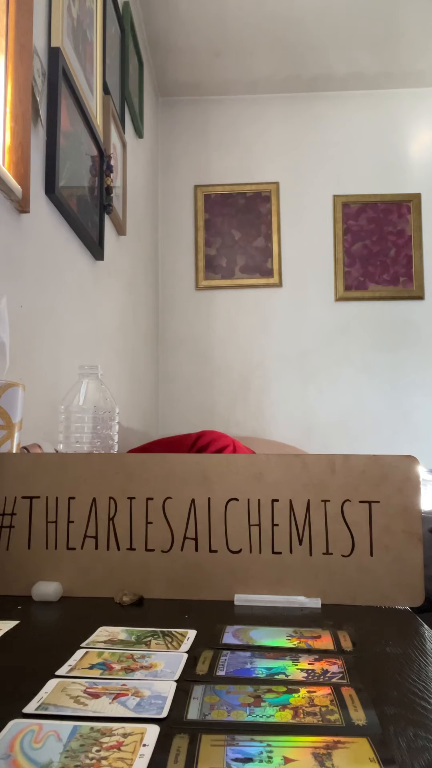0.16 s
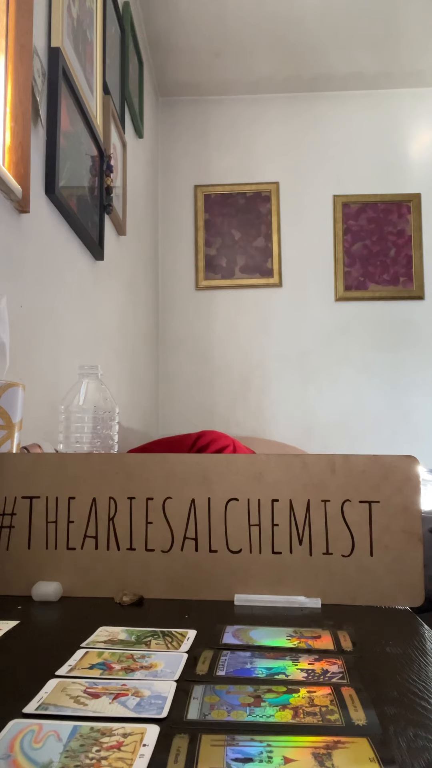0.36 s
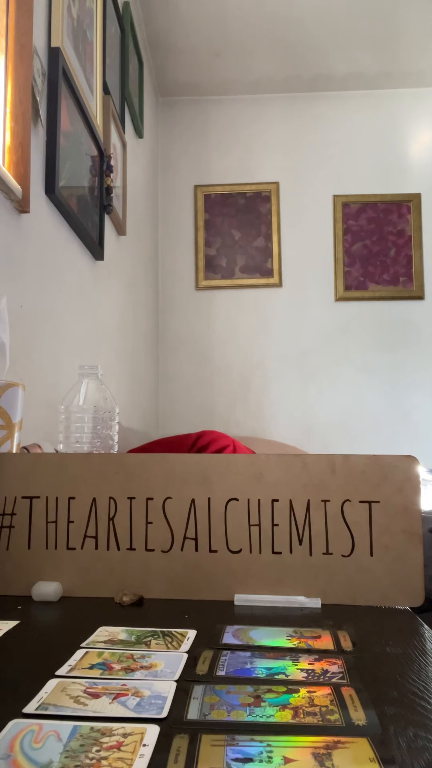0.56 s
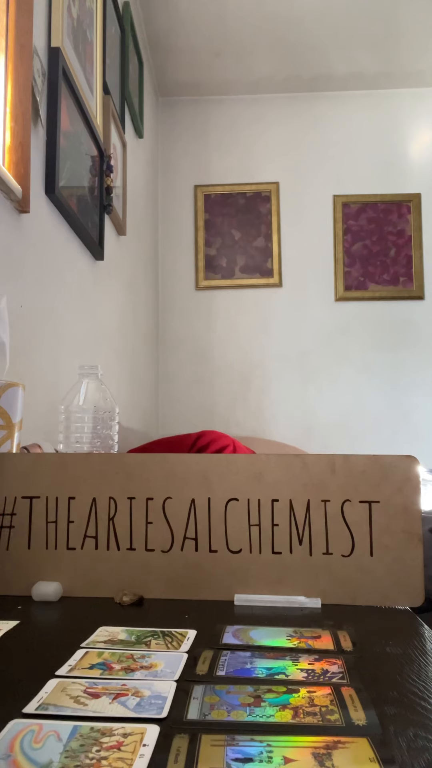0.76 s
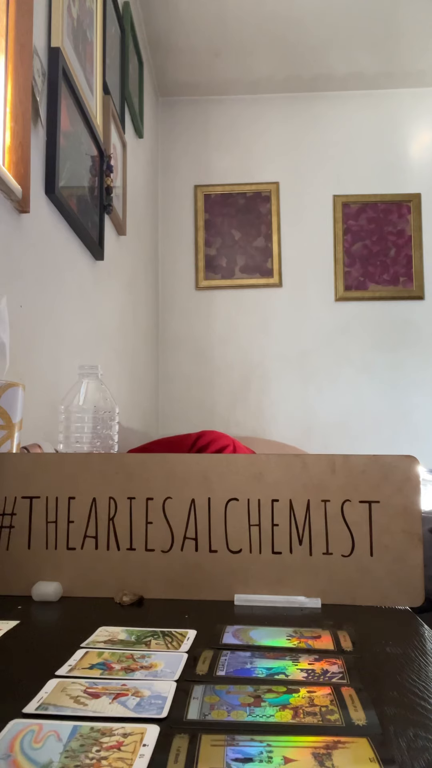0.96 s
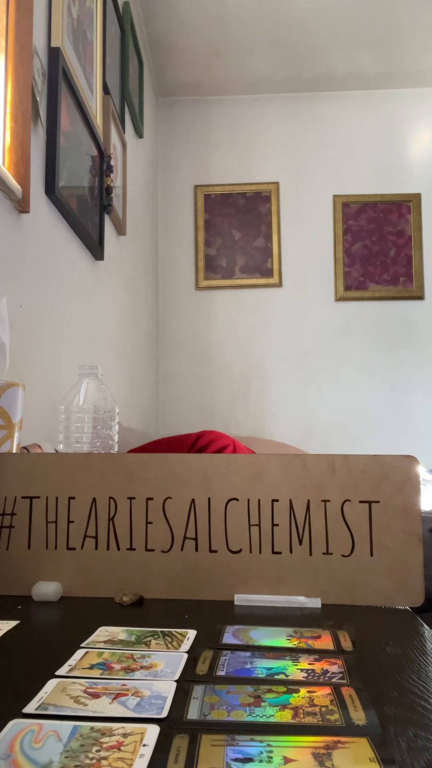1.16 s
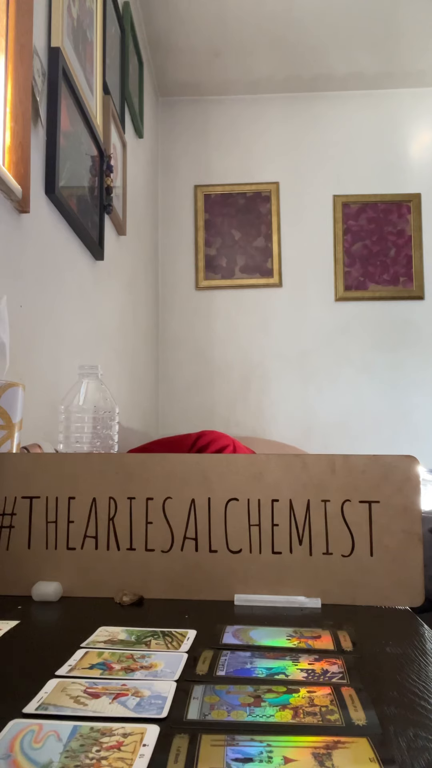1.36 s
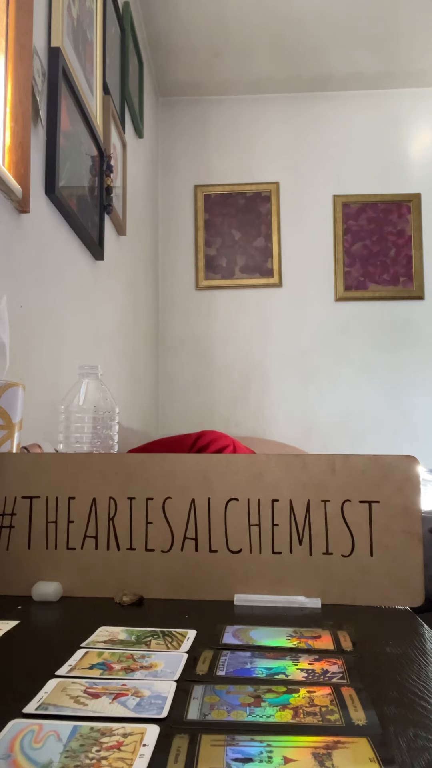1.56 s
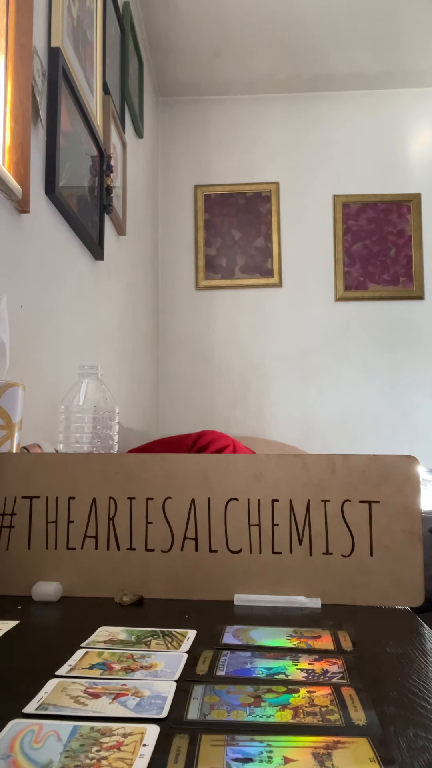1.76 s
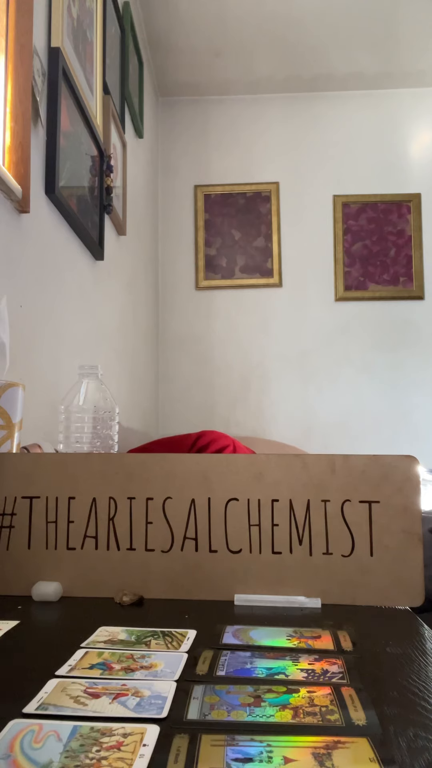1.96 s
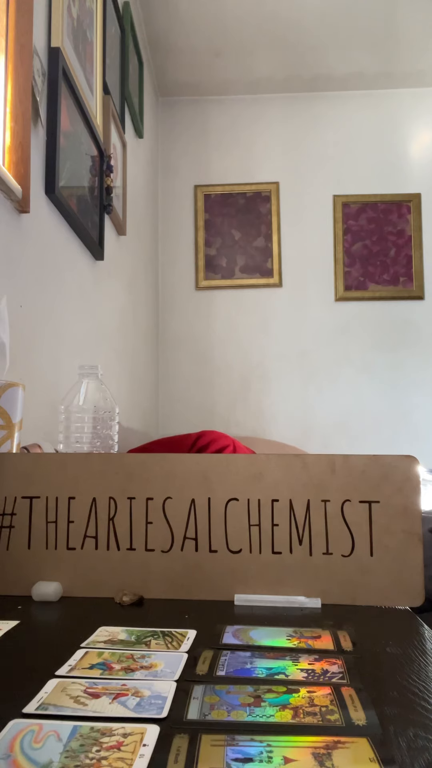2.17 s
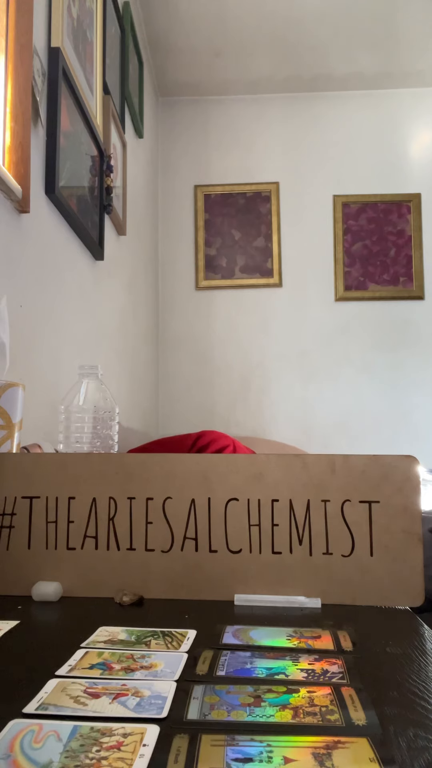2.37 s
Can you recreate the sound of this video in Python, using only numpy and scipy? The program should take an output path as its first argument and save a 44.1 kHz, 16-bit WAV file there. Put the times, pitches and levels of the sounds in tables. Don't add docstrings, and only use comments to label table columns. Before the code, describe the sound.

A deck of stiff cards is shuffled overhand close to a stereo microphone in a small quiet room. After a near-silent start, packets snap sharply from 0.15 to 0.7 seconds, some with a hollow tock, over soft table bumps and rustling. A denser burst closes around 1.05. Faint squaring taps follow, with a clearer double click near 1.76, then light sliding fades by 2.4.

```python
import sys
import numpy as np
from scipy import signal
from scipy.fft import rfft, irfft
from scipy.io import wavfile

SR = 44100
rng = np.random.default_rng(int(sys.argv[2]) if len(sys.argv) > 2 else 0)


def volts_from_decibels(level):
    exponent = np.asarray(level, float) / 20
    return 10 ** exponent


def persist_wave(psi):
    counts = np.round(np.clip(psi, -1, 1) * 32767).astype(np.int16)
    wavfile.write(sys.argv[1], SR, np.atleast_2d(counts).T)


N = 105840


def rms_one(x):
    return x / np.sqrt(np.mean(x ** 2) + 1e-20)


def peak_one(x):
    return x / (np.abs(x).max() + 1e-20)


def at_hz(points, hz):
    points = np.array(points)
    return np.interp(np.log(hz + 1), np.log(points[:, 0]), points[:, 1])


def colour(x, points):
    size = x.shape[-1]
    hz = np.arange(size // 2 + 1) * SR / size
    below = np.minimum(hz / points[0][0], 1) ** 3
    return irfft(rfft(x) * volts_from_decibels(at_hz(points, hz)) * below, size)


def band(x, order, low_hz, high_hz):
    return signal.sosfilt(signal.butter(order, [low_hz, high_hz], "band", fs=SR, output="sos"), x)


def ring(x, hz, t60):
    r, w = volts_from_decibels(-60 / (t60 * SR)), 2 * np.pi * hz / SR
    return signal.lfilter([0, np.sin(w)], [1, -2 * r * np.cos(w), r * r], x + 1e-18)


def drift(rate_hz):
    r = np.exp(-2 * np.pi * rate_hz / SR)
    noise = rng.standard_normal(N + 9000)
    return rms_one(signal.lfilter([1], [1, -2 * r, r * r], noise)[9000:])


def grains(chance, rate, spread_db):
    size = volts_from_decibels(-spread_db * np.log(chance[1] + 0.001))
    return (chance[0] < rate / SR) * size * np.sign(chance[2] - .5)


# freq_hz, share
OWN_SHARE = [(300, 0.42), (1000, 0.51), (3000, 0.88), (5500, 0.83), (6800, 0.58), (11000, 0.067),
             (14000, 0.022)]
# freq_hz, left_lead_rad
PORT_PHASE = [(60, 0), (1000, -.6), (2300, .7), (3500, -2.6), (5000, -3.8), (6600, -6.6), (9500, -7.6),
              (14000, -9.42)]


def ports(shared, own):
    hz = np.arange(len(shared) // 2 + 1) * SR / len(shared)
    share = np.clip(at_hz(OWN_SHARE, hz), 0, 1) * hz ** 2 / (hz ** 2 + 400 ** 2)
    lead = np.exp(1j * at_hz(PORT_PHASE, hz) * np.array([[1], [0]]))
    return irfft(rfft(shared) * np.sqrt(1 - share) * lead + np.sqrt(share) * rfft(own), len(shared))


def patchy(x):
    octave = np.log2(np.arange(N // 2 + 1) * SR / N + 1)
    spectrum = rfft(x)
    out = 0
    for k in range(5, 16):
        part = irfft(spectrum * np.clip(1 - np.abs(octave - k), 0, 1), N)
        out = out + part * volts_from_decibels(3 * drift(5.85))
    return out


# start_s, level_db, palm_contact_db, edge_hiss_db
SLIDE = [(0, -75.5, 16.5, -5), (.05, -89.5, 15.5, 7), (.125, -92, 9, -3), (.15, -37, 9, -11),
         (.29, -66.5, 17.5, 15), (.37, -55.5, 0, -2), (.45, -44, -3, -9), (.58, -54.5, 14, 5.5),
         (.8, -48, 6.5, -25), (.95, -47.5, 13, 2), (1.08, -54, 12.5, -16), (1.24, -62.5, 2, 8.5),
         (1.42, -58, -1.5, -1.5), (1.55, -45, -16, -3), (1.85, -44, 9.5, 0.5), (2.0, -57, 6, 5.5),
         (2.05, -66.5, 6.5, -2), (2.28, -60, -12.5, 3), (2.4, -57, -8.5, 2.5)]
# freq_hz, density_db
RUSTLE = [(150, -0.5), (800, 9), (1200, 1.5), (2600, 3), (4500, -1), (6000, -9), (11000, -10), (16000, -14)]
# freq_hz, level_db, t60_s
STACK = [(1570, 7, 0.02), (1732, 4.5, 0.015), (2200, -6.5, 0.087), (2500, -2, 0.035), (2902, 7.5, 0.013),
         (3820, -5.5, 0.0076), (4430, -6.5, 0.011), (4930, -40, 0.0069)]


def sliding():
    s, db, palm_db, edge_db = np.transpose(SLIDE)
    t = np.arange(N) / SR
    rub = grains(rng.random((3, 3, N)), rate=12000, spread_db=2.0)
    ringing = 0
    for k, (hz, mode_db, t60) in enumerate(STACK):
        ringing = ringing + volts_from_decibels(mode_db) * ring(rub, hz, t60 / 2) * (-1) ** k
    hiss = rms_one(rms_one(colour(rub, RUSTLE)) + volts_from_decibels(-9.5) * rms_one(ringing))
    palm_hz, edge_hz = 900, 5800
    dull = signal.filtfilt(*signal.butter(1, palm_hz * 1.36, fs=SR), hiss)
    edge = signal.lfilter(*signal.butter(2, edge_hz, "high", fs=SR), hiss)
    hiss = hiss + (volts_from_decibels(np.interp(t, s, edge_db)) - 1) * edge
    hiss = hiss + (volts_from_decibels(np.interp(t, s, palm_db)) - 1) * dull
    flicker_db = 2.2 * drift(33.4)
    hiss = patchy(hiss) * volts_from_decibels(np.interp(t, s, db) + flicker_db)
    heard = ports(hiss[0], hiss[1:])
    opposed = np.arange(N // 2 + 1) * SR / N > 11400
    return heard - irfft(rfft(heard.mean(0)) * opposed, N)


# peak_s, peak_db, pitch_hz
THUMPS = [(0.044, -48, 88.8), (0.16, -43, 68.5), (0.264, -27, 81), (0.41, -34.5, 91), (0.602, -31, 85.3),
          (0.738, -28, 62.7), (0.886, -36.5, 70), (1.048, -27.5, 64.7), (1.191, -41.5, 78.4),
          (1.26, -47, 78.6), (1.314, -41.5, 67.5), (1.7, -50.5, 68), (1.772, -32, 119), (1.951, -57.5, 82)]


def table():
    t, bumps = np.arange(N) / SR, 0
    for s, db, hz in THUMPS:
        push = np.exp(-((t - s) / 0.0042) ** 2)
        bumps = bumps + volts_from_decibels(db) * peak_one(ring(push, hz, t60=0.12))
    noise = rng.standard_normal((2, N))
    rumble = rms_one(band(noise[0], 2, 50, 130))
    hush = rms_one(band(noise[1], 1, 150, 900))
    s, slide_db, palm_db, _ = np.transpose(SLIDE)
    hands_db = np.interp(t, s, slide_db + 2 * palm_db)
    rumble_db = -61 + 0.45 * (hands_db + 55.0)
    return bumps + volts_from_decibels(rumble_db) * rumble + volts_from_decibels(-95.5) * hush


# start_s, peak_db, body_db (re peak), snap_db (re peak), ring_hz
DROPS = [(0.14, -26, 7, -7, 3300), (0.1545, -14, -8, -18, 2860), (0.16, -9.5, -5, 1, 2360),
         (0.176, -21.5, -12, -23, 4110), (0.2055, -8, -40, -16, 2170), (0.253, -8, -4.5, -3.5, 2720),
         (0.264, -17, -40.5, -10, 2300), (0.338, -32, 1, -14, 2840), (0.381, -28.5, 12, -16, 2000),
         (0.4015, -4, -16, -11, 2310), (0.425, -43, -30.5, -33, 2200), (0.4175, -24, -22.5, -25, 3920),
         (0.438, -17, 0, -4, 2120), (0.471, -5.5, -16, -8, 2200), (0.486, -35.5, -36.5, -4, 3580),
         (0.532, -18, -9.5, -16, 2200), (0.596, -8.5, -8, -7, 2200), (0.631, -10.5, -15.5, -17, 2533),
         (0.695, -9.5, -4, -2, 2900)]
# start_s, peak_db, body_db (re peak), snap_db (re peak), ring_hz
CLOSING = [(0.7315, -4.5, -16, -17, 2520), (0.740, -13.5, -30.5, -26.5, 2500),
           (0.748, -22.5, -25, -19, 2960), (0.753, -21, -22, -23, 2500), (0.766, -21.5, -13, -16.5, 2480),
           (0.773, -35.5, -33.5, -35.5, 2500), (0.811, -21.5, -11, -15, 2670),
           (0.855, -22.5, -9, -20, 2310), (0.875, -10, -11.5, -19.5, 2934),
           (0.885, -16.5, -10.5, -11.5, 2320), (0.935, -22, -5.5, -5, 2270),
           (0.966, -32, -10.5, -37.5, 1900), (0.981, -23.5, -35, -9, 4550), (0.988, -22, -9, -29.5, 1800),
           (1.001, -13, -14.5, -17, 1730), (1.015, -19, -7, -18.5, 2440), (1.028, -14.5, -3, -17, 2500),
           (1.036, -5, -7.5, -8.5, 2120), (1.0405, -9.5, 0, -11, 2420), (1.047, -22.5, 1.5, -6.5, 2500),
           (1.052, -16.5, -8.5, -17.5, 2600), (1.059, -26, 5, -23.5, 2500), (1.066, -28, -14.5, -33, 2600)]
# start_s, peak_db, body_db (re peak), snap_db (re peak), ring_hz
TAPS = [(1.162, -35.5, -11, -42, 2000), (1.172, -28.5, 0.5, -32.5, 1530), (1.18, -33, -6, -38, 2200),
        (1.304, -34.5, -7, -10.5, 1500), (1.316, -39.5, -8, -8, 3800), (1.37, -26, -36, 16, 4000),
        (1.38, -33, -35, -14.5, 1420), (1.475, -29, -9, -14, 2706), (1.609, -26, -20, -22, 2350),
        (1.618, -37, -36, -37, 2030), (1.645, -29, -20, -37, 2120), (1.652, -26, -13, -33.5, 1840),
        (1.748, -15, -19.5, -20.5, 2980), (1.761, -10, -20.5, -3.5, 2530), (1.765, -16, -9.5, -14.5, 2880),
        (1.836, -24, -18, -16, 2520), (1.941, -23, 0, -11, 2546), (2.031, -38.5, -25, -23, 2300),
        (2.159, -49.5, -33, -13.5, 2500)]
# freq_hz, level_db, t60_s
BODY = [(167, -4, 0.042), (426.6, -6.5, 0.078), (608, 7.5, 0.0049), (792, 10, 0.011), (864, -8, 0.12)]
# freq_hz, density_db
SNAP = [(3500, 7.5), (6000, -2.5), (9000, -7.5), (12000, -7), (16000, -11.5)]


def landings(rows, ring_db, span=1):
    out, size, lead = np.zeros((2, N + SR)), 8192, 1024
    t = (np.arange(size) - lead) / SR

    def fall(tau_s, lag_s=0, hold_s=0):
        brush = volts_from_decibels(-17) * np.exp((t - lag_s).clip(max=0) / 0.0027)
        decay = np.exp(-(t - lag_s - hold_s * span).clip(0) / (tau_s * span))
        return np.where(t < lag_s, brush, decay)

    for (s, db, low_db, top_db, hz), chance in zip(rows, rng.random((len(rows), 6, size))):
        snaps = grains(chance, rate=3300, spread_db=2.5) + 0.65 * (chance[3] - .5)
        snaps[lead] = 2.5
        luck = volts_from_decibels(3.5 * 2 * (chance[3, :20] - .5))
        hit = snaps * (fall(0.0015, hold_s=0.002) + volts_from_decibels(-14) * fall(0.0039))
        push = snaps[::-1] * fall(0.0069, lag_s=0.0013)

        stack = 0
        for k, (g, (mode_hz, mode_db, t60)) in enumerate(zip(luck, STACK)):
            stack = stack + g * volts_from_decibels(mode_db) * ring(hit, mode_hz, t60) * (-1) ** k
        slap = band(hit, 1, 1200, 5000)
        own_note = ring(hit, hz, t60=0.012)
        mid = peak_one(stack) + volts_from_decibels(-8) * peak_one(slap) + volts_from_decibels(ring_db) * peak_one(own_note)

        low = 0
        for g, (mode_hz, mode_db, t60) in zip(luck[10:], BODY):
            low = low + g * volts_from_decibels(mode_db) * ring(push, mode_hz, t60) * np.sqrt(mode_hz)
        top = colour(snaps * (fall(0.0017) + volts_from_decibels(-12) * fall(0.015)), SNAP)

        sound = volts_from_decibels(3) * peak_one(mid)
        sound = sound + volts_from_decibels(low_db + 4.5) * 2 * peak_one(low)
        sound = sound + volts_from_decibels(top_db + 17.5) * 2 * peak_one(top)
        near = rfft((chance[4:] - .5) * np.exp(-np.arange(size) / (0.0013 * SR)))
        near = near / np.sqrt(np.mean(np.abs(near) ** 2))
        own = irfft(rfft(sound) * near, size)
        i = int(s * SR)
        out[:, i:i + size] += volts_from_decibels(db) * peak_one(ports(sound, own))
    return out[:, lead:lead + N]


# peak_s, peak_db, pitch_hz, t60_s
TOCKS = [
    (0.16, -15.5, 2150, 0.041),
    (0.207, -6, 2190, 0.025),
    (0.264, -21.5, 2226, 0.036),
    (0.402, -6, 2178, 0.028),
    (0.439, -24.5, 2194, 0.029),
    (0.473, -11.5, 2190, 0.04),
    (0.7332, -9.5, 2500, 0.022),
    (0.743, -16, 2500, 0.033),
    (1.043, -16, 2491, 0.029),
]


def tocks():
    t, out = np.arange(N) / SR, 0
    wobble, flutter = 0.72 * drift(120.0), drift(90)
    left_lead = .7 * np.array([[1], [0]])
    for s, db, hz, t60 in TOCKS:
        swell = np.exp(-((s - t).clip(0) / .0028) ** 0.95)
        decay = volts_from_decibels(-60 * (t - s - .0022).clip(0) / min(t60, .032))
        tail = volts_from_decibels(-20 - 60 * (t - s).clip(0) / .15) * (t > s) * flutter
        shape = (np.where(t < s, swell, decay) + tail) * volts_from_decibels(1.5 * flutter)
        out = out + volts_from_decibels(db - 9.5) * shape * np.sin(2 * np.pi * hz * t + wobble + left_lead)
    return out


def room(x):
    t = np.arange(SR // 2) / SR
    tail = rng.standard_normal((2, len(t))) * volts_from_decibels(-60 * t / 0.16) * (1 - np.exp(-t / 0.0039))
    tail = band(tail, 2, 400, 5750)
    tail /= np.sqrt((tail ** 2).sum(1, keepdims=True))
    return volts_from_decibels(-17.5) * signal.fftconvolve(x, tail, axes=1)[:, :N]


def scene():
    cards = landings(DROPS, ring_db=3.5) + landings(CLOSING, ring_db=-0.5)
    cards = cards + landings(TAPS, ring_db=-6, span=0.74) + tocks()
    return sliding() + table() + cards + room(cards)


def low_pass(x):
    return signal.sosfilt(signal.butter(12, 16960, fs=SR, output="sos"), x)


# freq_hz, level_db
MIC = [(30, -23), (55, 0), (850, 0.5), (1150, -1.5), (1500, 4.5), (2300, 8), (3300, 7), (15800, 0.5)]
# freq_hz, left_minus_right_db
BALANCE_DB = [(60, -1.5), (240, -2), (950, -2.5), (3770, 0.5), (15000, -1)]


def record(dry):
    hz = np.arange(N // 2 + 1) * SR / N
    mic_db = at_hz(MIC, hz) - 22 * (hz > 15900)
    side_db = at_hz(BALANCE_DB, hz) * np.array([[.5], [-.5]])
    mix = np.tanh(irfft(rfft(dry) * volts_from_decibels(mic_db + side_db), N))
    return low_pass(mix)


dry = scene()
out = record(dry)
persist_wave(out)
```